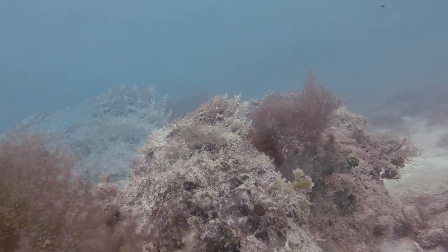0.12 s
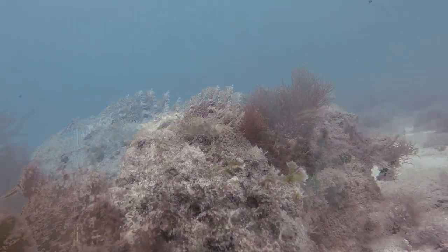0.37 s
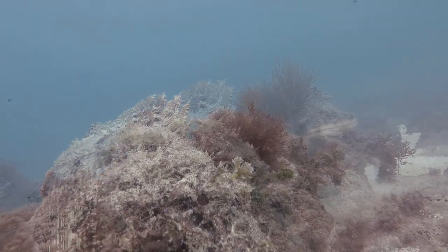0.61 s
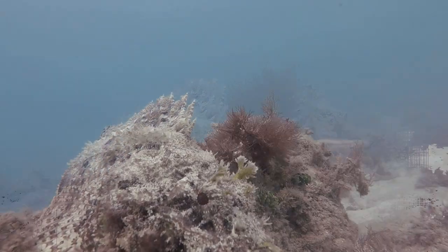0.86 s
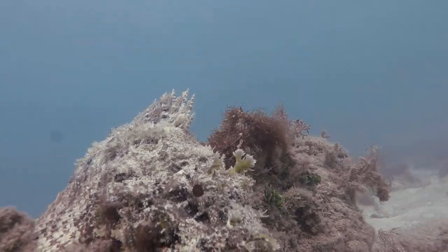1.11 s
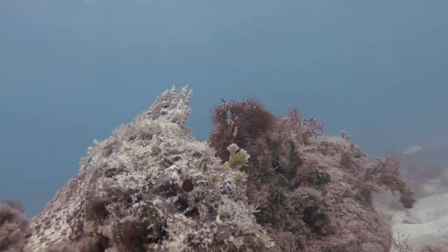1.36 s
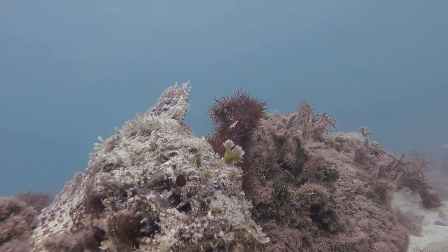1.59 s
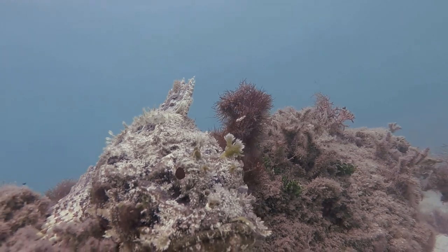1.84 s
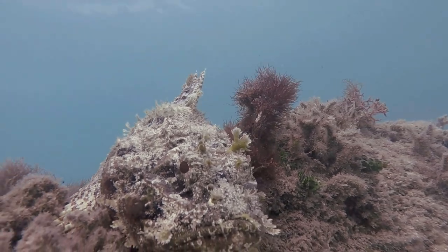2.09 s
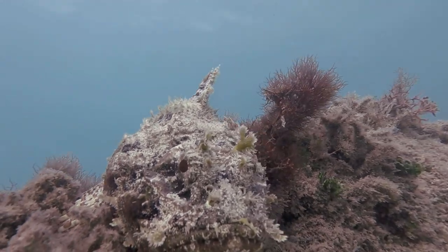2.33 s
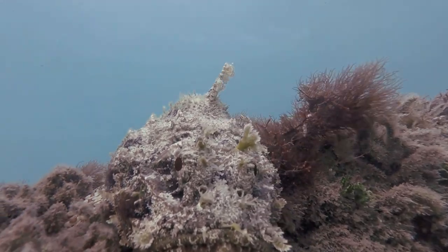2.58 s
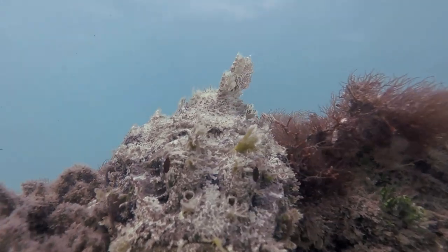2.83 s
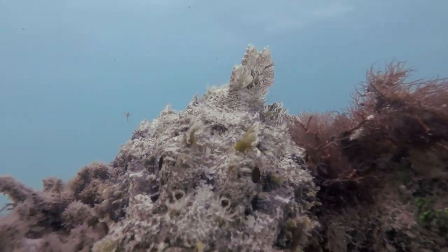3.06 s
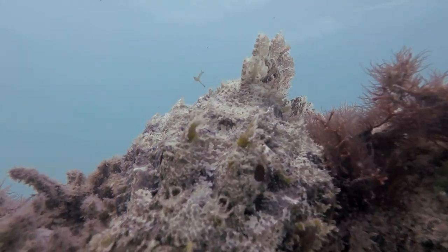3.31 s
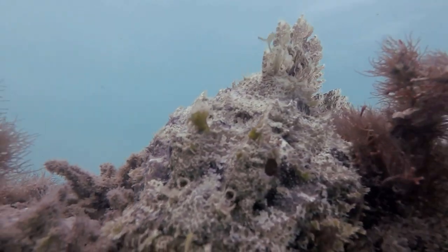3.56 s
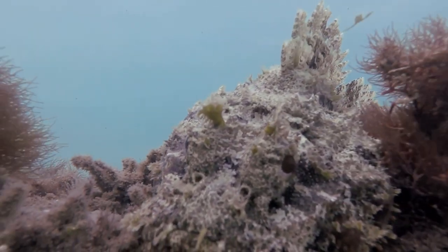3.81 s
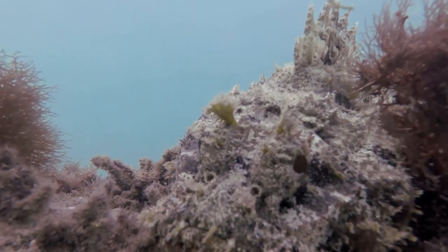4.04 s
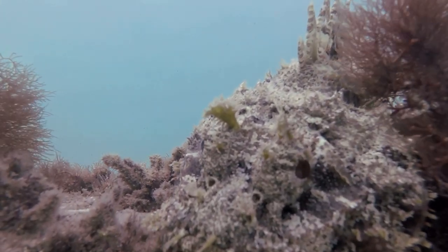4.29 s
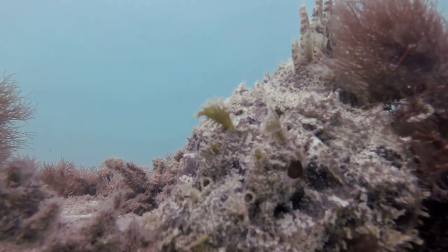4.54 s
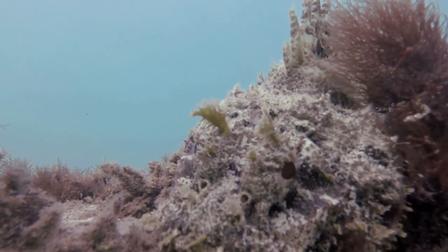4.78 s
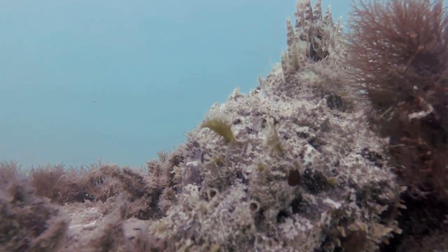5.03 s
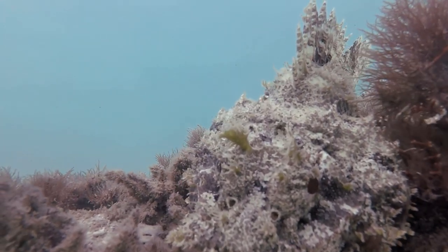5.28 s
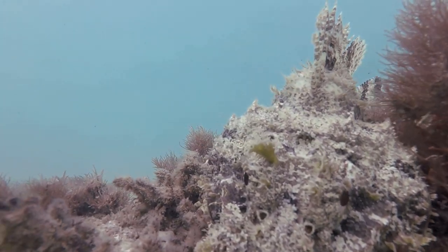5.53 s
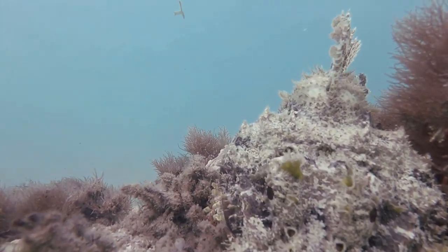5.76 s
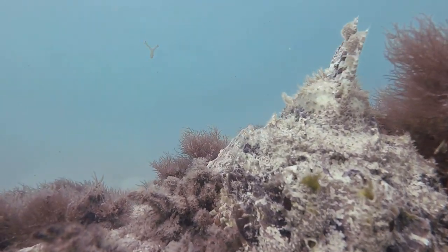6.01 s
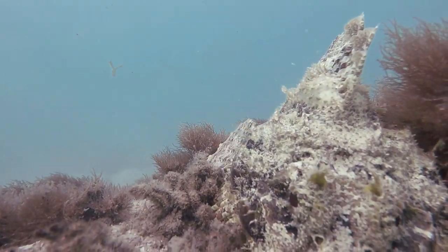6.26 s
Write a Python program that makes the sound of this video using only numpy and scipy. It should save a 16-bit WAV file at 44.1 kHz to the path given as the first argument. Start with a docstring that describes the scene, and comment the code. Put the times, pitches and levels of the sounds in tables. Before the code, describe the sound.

A dense crackle of tiny snaps fades in over murky water wash; near clicks knock hollowly, and a soft bump shudders around three seconds.

```python
"""Out of silence fade sharp, ringing clicks over a fine crackle: snapping shrimp, near and far, by a shallow reef.
Each snap strikes the modes of a sealed camera housing; two microphones inside hear every mode differently.
Hands bump the housing in soft sinking pushes; after the hardest, it judders while water sloshes.
Behind them lies a wash of shaped noise whose bass swells and ebbs as water slides by."""
import sys
import numpy as np
from scipy import signal
from scipy.io import wavfile
from scipy.ndimage import uniform_filter1d

SR = 44100
rng = np.random.default_rng(int(sys.argv[2]) if len(sys.argv) > 2 else 0)


def boost_factor(decibels):
    """Convert a level in decibels to a linear amplitude factor."""
    exponent = np.asarray(decibels, float) / 20
    return 10 ** exponent


def pcm_store(signal):
    """Save signal as 16-bit PCM."""
    levels = np.round(np.clip(np.atleast_2d(signal), -1, 1) * 32767)
    wavfile.write(sys.argv[1], SR, levels.astype(np.int16).T)


N = 281358  # length [samples]

# Near snaps, strength before the reach below: (time [s], strength [dB], pitch where it strikes hardest [Hz],
# fall below that pitch [dB per octave], fall above it [dB per octave])
NEAR_SNAPS = [(0.106, -33.5, 9400.0, 2, 3.0), (0.132, -31, 2680.0, 3, 3.0), (0.151, -18.5, 9400.0, 9, 3.0),
              (0.249, -13, 820.0, 11, 2.5), (0.299, -19.5, 1530.0, 8.5, 14), (0.378, -25.5, 6630.0, 5, 6),
              (0.418, -24.5, 3800.0, 9, 2), (0.536, -24.5, 7110.0, 7.5, 4),
              (0.577, -29.5, 7630.0, 5.0, 3.0), (0.599, -32, 6630.0, 6, 2), (0.63, -33.0, 6630.0, 2, 4.5),
              (0.673, -18.5, 1910, -1, 8.5), (0.702, -31.5, 940.0, 3.5, 0), (0.73, -32, 940.0, 5, 4),
              (0.762, -19.5, 4260, 14.5, 6), (0.842, -32.5, 3080.0, 4.0, 7.5), (0.932, -20, 6700, 3.5, 5),
              (0.98, -21.5, 6630.0, 6, 9), (1.01, -34.0, 2330.0, -0.5, 2.0), (1.153, -34, 2500.0, 8, 3.5),
              (1.195, -9.5, 610, 3.0, 3.5), (1.353, -18, 9400.0, 7, 9), (1.382, -34, 9400.0, 1.5, 3.0),
              (1.416, -24.0, 2680.0, 5, 2.5), (1.503, -29, 1660, 16, 9), (1.574, -12.5, 1160, -1, 8.5),
              (1.613, -32, 1010.0, 9, 4), (1.646, -34, 1700, 10, 15), (1.661, -34, 2200, 12, 12),
              (1.719, -29.5, 6630.0, 3.5, 7), (1.775, -23.5, 1530.0, 3, 2),
              (1.878, -25.0, 3080.0, 2.0, 6.5), (1.899, -35, 2400, 12, 12),
              (1.939, -29.5, 1010.0, 5.0, 1.0), (1.978, -18, 6240, 1.0, 8), (2.047, -24.5, 9400.0, 7, 3.0),
              (2.08, -19.5, 1030, 13, 4), (2.107, -29.5, 1530.0, 8, 3), (2.159, -33, 1530.0, 11, 2.5),
              (2.293, -25, 3540.0, 4.5, -0.5), (2.318, -34, 1530.0, 9, 5.0), (2.342, -10, 615, 1, 4.5),
              (2.394, -20, 6630.0, 6, -2), (2.45, -27.5, 1240.0, 3, 10), (2.531, -32.0, 620.0, 5, 1.5),
              (2.564, -25.5, 9400.0, 5, 6), (2.577, -23.0, 1650.0, 8, 3.5), (2.775, -26, 1240.0, 3, 3.5),
              (2.919, -6, 614, -3, 4.5), (2.987, -25.5, 620.0, 3.0, 2.5), (3.007, -25.5, 7110.0, 3, -3),
              (3.056, -13.5, 620.0, 5, 2.0), (3.148, -27, 620.0, 3.0, 4), (3.239, -34, 1430.0, 0, 2.0),
              (3.255, -31, 6190.0, 2.0, 2), (3.275, -19.5, 9400.0, 0.5, -3),
              (3.374, -28.5, 3800.0, 6.5, 7.0), (3.435, -24, 4300, 11, 20), (3.524, -29.5, 940.0, 6, 0),
              (3.563, -2, 710.0, 7, 6), (3.587, -30.5, 620.0, 3.0, 1.0), (3.645, -35, 6630.0, 2, 3.5),
              (3.668, -28, 1650.0, 4, 3.5), (3.785, -35, 4400, 4, 10), (4.109, -32.5, 1530.0, 11, 2),
              (4.18, -35.0, 9400.0, 1, 3.0), (4.211, -24, 1660, 13, 8.5), (4.252, -35, 4370.0, 7, 11),
              (4.271, -25, 1000, 14, 2), (4.375, -38.0, 2330.0, 4, 7), (4.435, -27, 5020.0, 5, 12),
              (4.545, -21, 5020.0, 10, 8), (4.593, -19, 3100, 4.5, 6), (4.652, -20, 1080.0, -0.5, 2.5),
              (4.735, -30.0, 1010.0, 10, 1.5), (4.793, -32.5, 2170.0, 4.5, 5.5),
              (4.803, -32.0, 1530.0, 1.5, 2), (4.895, -32.5, 3080.0, 7, 2), (4.998, -37.0, 3080.0, 1, 2.5),
              (5.146, -27, 9400.0, 5.5, 5), (5.212, -30, 6190.0, 13, 5.0), (5.252, -35.0, 2500.0, 4.0, -2),
              (5.279, -33.5, 1010.0, 4.5, 0.5), (5.285, -26.5, 1010.0, 8, 1),
              (5.362, -34.5, 9400.0, 2.5, 3.0), (5.398, -18.5, 1150, 9, 6.5), (5.54, -30.5, 9400.0, 3.5, 0),
              (5.558, -30.5, 9400.0, -0.5, 3.0), (5.638, -37, 2400, 8, 10), (5.657, -22.5, 4300, 8, 19),
              (5.675, -21.5, 940.0, 1, 1), (5.792, -15.5, 3080.0, 3, 12), (5.812, -31, 6200, 6, 8),
              (5.938, -35.5, 2500.0, 3.5, 4.5), (5.963, -25.5, 940.0, 14, 11), (6.038, -21, 4240, 12.5, 21),
              (6.085, -22.5, 940.0, 11, 16), (6.111, -29.5, 1530.0, 8, 17), (6.154, -26, 9400.0, 3.5, 3.0),
              (6.187, -36, 1600, 12, 10), (6.198, -27.5, 6630.0, 3.5, 7), (6.226, -16.0, 3540.0, 4.0, 7),
              (6.255, -19, 2200, 6.5, 7.5), (6.291, -35, 1600, 10, 16), (6.316, -21.0, 1100, 13, 6)]
# Upper edges of the housing's boom, hollow, knock and tick ranges; fizz lies above: (edge [Hz])
RANGE_TOPS_HZ = [820, 1400, 2650, 8000]
# How readily a near snap reaches boom, hollow, knock, tick and fizz: (gain [dB])
NEAR_REACH_DB = [-8, -6, -1, -7.5, -22.5]
# Base strength of far snaps in the same five ranges, before size and colour: (level [dB])
CRACKLE_DB = [-54.5, -55, -53.5, -54, -72.5]
# Ring of the housing, one mode a row: (pitch [Hz], time to decay by 60 dB [s],
# left gain [dB], right gain [dB], phase lead at the right [rad])
HOUSING_MODES = [(609.3, 0.044, 4, -11, 2.5), (720, 0.052, -51, -10.5, 2.5), (938, 0.019, -3, -6, 1),
                 (1000, 0.037, -0.5, -1.5, 2.5), (1212, 0.023, -7.5, -19, 5.5),
                 (1521, 0.02, -7.5, -4, 1.52), (1706, 0.018, -4.5, -8.5, -0.2), (2259, 0.021, -1, -2, 2.5),
                 (2475, 0.014, -2.5, -4.5, 2), (2754, 0.024, -5.5, -7.5, 4),
                 (3076, 0.02, -8.5, -8.5, -0.88), (3790, 0.012, -7, -13, 8),
                 (4254, 0.0091, -4.5, -5.5, 1.5), (4806, 0.011, -9, -11.5, -2),
                 (5820, 0.0065, -4.5, -15.5, -0.74), (6240, 0.012, -2.5, -14, -2.5),
                 (7123, 0.0089, -0.5, -10, -2.5), (8750, 0.011, 1.5, -5, 1.5), (10040, 0.0035, 6, 0, 0.3),
                 (13200, 0.0018, -3, -13, 1.8), (390, 0.017, -12, -18, 1)]
CRACKLE_PER_S = 130
CRACKLE_SPREAD_DB, CRACKLE_LARGEST = 4.5, 3.38  # dB per unit of random size, and the cap on size
CRACKLE_FALL_DB = 13  # steepest fall an octave away from a far snap's pitch


def snaps():
    """Snap times [s] and drive by mode [dB]: near ones from the table, farther ones at random."""
    near_s, strength_db, pitch_hz, below, above = np.transpose(NEAR_SNAPS)[:, :, None]
    mode_hz = np.transpose(HOUSING_MODES)[0]
    band = np.searchsorted(RANGE_TOPS_HZ, mode_hz)
    octaves = np.log2(mode_hz / pitch_hz)
    tilt_db = below * np.minimum(octaves, 0) - above * np.maximum(octaves, 0)
    near_db = strength_db + tilt_db + np.take(NEAR_REACH_DB, band)

    gap, size, place, narrow = rng.random((3000, 4)).T[:, :, None]
    far_s = np.cumsum(-np.log(gap)) / CRACKLE_PER_S
    size_db = CRACKLE_SPREAD_DB * np.minimum(-np.log(size), CRACKLE_LARGEST)
    # path and claw differ, so each snap has its own pitch, some broad, some narrow
    far_hz = 700 * 12 ** place
    colour_db = -CRACKLE_FALL_DB * narrow * abs(np.log2(mode_hz / far_hz))
    far_db = np.take(CRACKLE_DB, band) + size_db + colour_db

    snap_s = np.r_[near_s[:, 0], far_s]
    mode_db = np.r_[near_db, far_db]
    in_time = snap_s < N / SR - .02
    return snap_s[in_time], mode_db[in_time]


# The farthest snaps merge into a hiss: relative drive in boom, hollow, knock, tick and fizz: (level [dB])
MERGED_DB = [-88, -59.5, -64.5, -64.5, -92]


def housing(snap_s, mode_db, blows):
    """Decaying resonators struck by each snap and its scattered echoes off rock, sand and surface."""
    count = len(snap_s)
    strength, turn, skew = rng.standard_normal((count, len(HOUSING_MODES), 3)).T
    gaps_s, echo_turn = rng.random((count, 9, 2)).T
    # the first of the nine paths is direct
    delays_s = np.cumsum(gaps_s ** 2 * .008, 0) * (np.arange(9) > 0)[:, None]
    out = np.zeros((2, N))
    for k, (hz, t60_s, left_db, right_db, lead) in enumerate(HOUSING_MODES):
        band = np.searchsorted(RANGE_TOPS_HZ, hz)
        hit = boost_factor(mode_db[:, k] + (1.03 + hz / 2500) * strength[k]) * np.exp(2j * turn[k])
        # direction shifts the phase between microphones
        apart = np.array([np.ones(count), np.exp(.45j * skew[k])])
        hiss = rng.standard_normal(N) + 1j * rng.standard_normal(N)
        drive = boost_factor(MERGED_DB[band] - 27.5) * hiss * np.ones((2, 1))
        for delay_s, bounce in zip(delays_s, echo_turn):
            # later paths are weaker
            path_gain = boost_factor(-6.5 * (delay_s > 0) - 1270 * delay_s)
            echo = path_gain * np.exp(2j * np.pi * bounce * (k + 1))
            at = np.minimum(((snap_s + delay_s) * SR).astype(int), N - 1)
            np.add.at(drive, (slice(None), at), echo * hit * apart)
        if k == 0:  # the boom mode
            drive += blows
        spin = np.exp(2j * np.pi * hz / SR)
        ring = np.exp(-np.log(1000) / (t60_s * SR))
        # the bubble collapse is not instant, and low modes swell slower
        rise = np.exp(-1 / (SR * (.0005 + .6 / hz)))
        poles = np.convolve([1, -ring * spin], [1, -rise * spin])
        rung = signal.lfilter([1 - rise], poles, drive)
        mic_gain = boost_factor([[left_db], [right_db]])
        mic_phase = np.exp([[0], [1j * lead]])
        out += (rung * mic_gain * mic_phase).real
    return out


# Soft bumps on the housing, level before the heavy-housing filter:
# (time [s], drive level [dB], pitch at mid-push [Hz])
SOFT_BUMPS = [(1.747, -14.5, 251), (1.791, -29, 251), (1.803, -30, 274), (2.429, -21, 298),
              (2.958, -0.5, 218), (3.326, -35.5, 190), (3.863, -23.5, 175), (5.334, -34.5, 161)]
# After the hardest bump the housing judders in a run of small pushes that holds, then fades, while it deepens
JUDDER_START_S, JUDDER_END_S, JUDDER_HOLD_S = 2.997, 3.265, .1
JUDDER_GAP_S, JUDDER_UNEVEN = 0.017, 0.48  # unevenness is a share of the gap
JUDDER_DB, JUDDER_FALL_DB_PER_S, JUDDER_SPREAD_DB = -17, 65, 1
JUDDER_HZ, JUDDER_SAG_HZ_PER_S, JUDDER_SCATTER = 210, 380, 0.25  # start pitch, sag, random log-pitch spread


def pushes():
    """Rows (time [s], drive level [dB], pitch [Hz]) of the bumps and the judder of the knocked housing."""
    gap, size, pitch = rng.standard_normal((40, 3)).T
    step = np.arange(len(gap))
    since_s = JUDDER_GAP_S * (step + JUDDER_UNEVEN * np.tanh(gap) * (step > 0))
    fall_db = JUDDER_FALL_DB_PER_S * np.maximum(since_s - JUDDER_HOLD_S, 0)
    level_db = JUDDER_DB - fall_db + JUDDER_SPREAD_DB * size
    hz = (JUDDER_HZ - JUDDER_SAG_HZ_PER_S * since_s) * np.exp(JUDDER_SCATTER * pitch)
    judder = np.c_[JUDDER_START_S + since_s, level_db, hz]
    return np.r_[SOFT_BUMPS, judder[judder[:, 0] < JUDDER_END_S]]


BUMP_GLIDE = 0.95  # log-pitch drop per cycle
BUMP_RISE_CYCLES, BUMP_FALL_CYCLES = 0.5, 0.67
SLOSH_START_S, SLOSH_RISE_S, SLOSH_DRAIN_S = 2.975, 0.03, 0.24
SLOSH_DB = -29  # rms of the murky noise before its swell


def bumps(rows):
    """Soft pushes of about a cycle and a half that sink in pitch, plus a slosh of low-passed noise."""
    out = np.zeros(N + SR)
    t = np.arange(-300, 900) / SR
    for (s, db, hz), phase in zip(rows, rng.normal(0, 0.21, 60)):
        at = round(s * SR) - 300
        cycles = hz * t
        sinking = (1 - np.exp(-BUMP_GLIDE * cycles)) / BUMP_GLIDE
        swing = np.cos(2 * np.pi * sinking + 1.95 + phase)
        width = np.where(t < 0, BUMP_RISE_CYCLES, BUMP_FALL_CYCLES)
        out[at:at + 1200] += boost_factor(db) * swing * np.exp(-(cycles / width) ** 2)
    # the heavy housing yields most to slow pushes
    out = boost_factor(7.5) * signal.sosfilt(signal.butter(1, 110, fs=SR, output="sos"), out)
    since_s = np.arange(N) / SR - SLOSH_START_S
    murky = signal.butter(2, 160, fs=SR, output="sos")
    murk = evened(signal.sosfilt(murky, rng.standard_normal(N)))
    swell = np.clip(since_s / SLOSH_RISE_S, 0, 1) * np.exp(-(since_s / SLOSH_DRAIN_S) ** 2)
    return out[:N] + boost_factor(SLOSH_DB) * murk * swell


# Dull taps, some in an evenly spaced run, that ring only the boom mode: (time [s], drive level [dB])
DULL_TAPS = [(.63, -33), (.756, -20), (1.635, -41), (1.67, -38.5), (1.702, -35), (1.789, -37),
             (1.833, -39.5), (1.914, -30.5), (1.952, -34.5), (1.989, -23.5), (2.024, -33), (2.069, -27),
             (2.14, -41), (4.043, -29.5), (5.567, -33), (5.997, -36), (6.219, -34.5), (6.331, -32)]


def jolts(rows):
    """The taps and the hard edge of each push, as one-sample blows for the boom mode."""
    out = np.zeros(N)
    for s, db in DULL_TAPS:
        out[round(s * SR)] = boost_factor(db)
    for s, db, hz in rows:
        out[round((s - .004) * SR)] = boost_factor(db - 16.0)
    return out


# Colour of water wash and microphone hiss before the low cut: (pitch [Hz], relative density [dB per Hz])
WASH_COLOUR = [(20, -5), (60, -16), (150, 0), (300, -8.5), (600, -9), (1500, -18), (4000, -30.5),
               (9000, -29.5), (12000, -37), (14800, -42.5), (15500, -73)]
# Likeness of left and right, 1 alike, -1 opposed: (pitch [Hz], correlation [-1 to 1])
WASH_SAME = [(60, 1), (200, -0.23), (500, -0.64), (1200, -0.87), (3000, 0.33), (9000, 0.019)]
# How much louder the wash is at the left: (pitch [Hz], balance [dB])
WASH_BALANCE = [(60, 4.4), (200, 1.1), (1000, 0.17), (8000, 0.21)]
# Water flowing past swells and ebbs; only the swing about the mean counts: (time [s], bass level [dB])
FLOW = [(0.9, -54), (2.1, -56), (2.87, -53), (3.5, -55.5), (4.27, -56.5), (5.14, -56.5), (5.5, -55),
        (6.38, -56)]
WASH_DB = -47  # rms over both channels before the low cut


def wash():
    """Random short-time spectra with drifting patches; the bass comes in lumps as water slides by."""
    frames = N // 256 + 5
    hz = np.fft.rfftfreq(1024, 1 / SR)
    a, b, c, d, patches = rng.standard_normal((frames, 513, 5)).T
    patches = uniform_filter1d(patches, size=12, axis=0)
    patches = evened(uniform_filter1d(patches, size=14, axis=1))
    lumps = evened(uniform_filter1d(rng.standard_normal(frames), size=9))
    flow_s, flow_db = np.transpose(FLOW)
    frame_s = np.arange(frames) * 256 / SR
    surge_db = np.interp(frame_s, flow_s, flow_db - np.mean(flow_db)) + 0.53 * lumps
    bass_db = surge_db / (1 + (hz[:, None] / 450) ** 2)

    same = np.clip(read(WASH_SAME, hz), -1, 1)[:, None]
    left = a + 1j * b
    right = same * left + np.sqrt(1 - same ** 2) * (c + 1j * d)
    right = right / boost_factor(read(WASH_BALANCE, hz))[:, None]
    spectra = np.array([left, right])
    spectra *= boost_factor(read(WASH_COLOUR, hz)[:, None] + 0.91 * patches + bass_db)
    noise = signal.istft(spectra, nperseg=1024, noverlap=768)[1][:, :N]
    return boost_factor(WASH_DB) * evened(noise)


def read(points, hz):
    """Joins (pitch [Hz], value) points on a log-frequency axis."""
    f, value = np.transpose(points)
    return np.interp(np.log(hz + 1), np.log(f + 1), value)


def evened(x):
    """Scales to rms 1."""
    return x / np.sqrt(np.mean(abs(x) ** 2) + 1e-20)


def scene():
    """Snaps, taps and bumps in the housing over the wash; pushes and slosh are strongest at the left."""
    left_heavy = boost_factor([[0], [-11]])
    rows = pushes()
    rung = housing(*snaps(), jolts(rows))
    return rung + bumps(rows) * left_heavy + wash()


def top_cut(x):
    """Nothing passes above the cut-off."""
    return signal.sosfilt(signal.butter(12, 15560, fs=SR, output="sos"), x)


def record(dry):
    """A steep low cut without delay, electronic rumble, a band limit, soft rounding of the tallest peaks and a
    fade-in."""
    low_cut = signal.cheby2(8, 26, 120, "high", fs=SR, output="sos")
    rumble = rng.standard_normal((2, N)) + 1.8 * rng.standard_normal(N)  # partly shared by both channels
    rumble = signal.sosfilt(signal.butter(1, 35, fs=SR, output="sos"), rumble)
    rumble = evened(rumble) * boost_factor([[2], [-2]])
    heard = signal.sosfiltfilt(low_cut, dry) + boost_factor(-73.5) * rumble
    heard = signal.sosfilt(signal.cheby2(10, 40, 16400, fs=SR, output="sos"), heard)
    heard = np.tanh(heard)  # the tallest peaks are rounded off softly
    fade = np.clip((np.arange(N) / SR - .08) / 0.95, 0, 1)
    return top_cut(heard * fade)


dry = scene()
out = record(dry)
pcm_store(out)
```